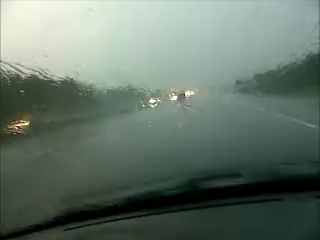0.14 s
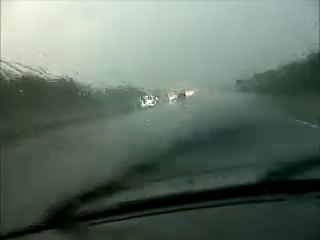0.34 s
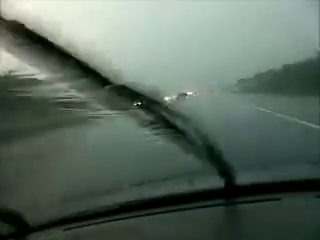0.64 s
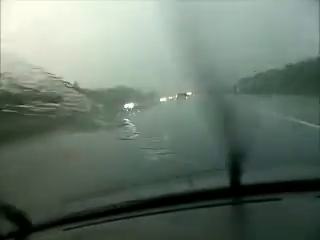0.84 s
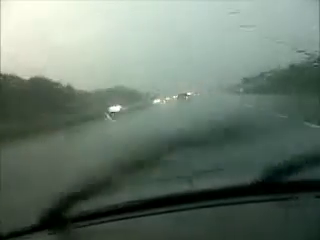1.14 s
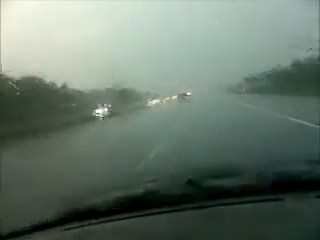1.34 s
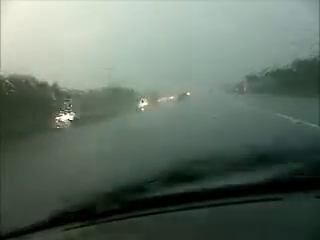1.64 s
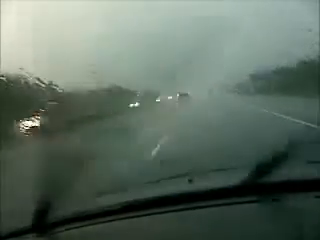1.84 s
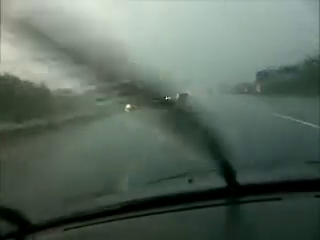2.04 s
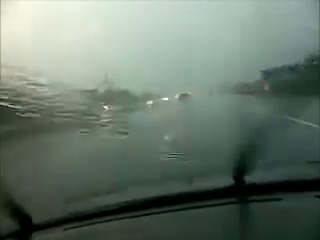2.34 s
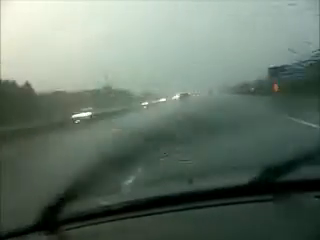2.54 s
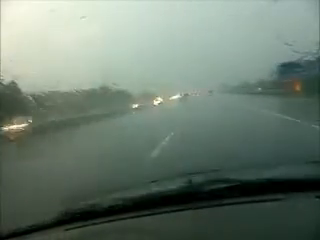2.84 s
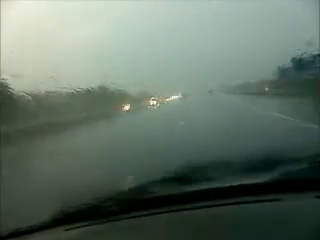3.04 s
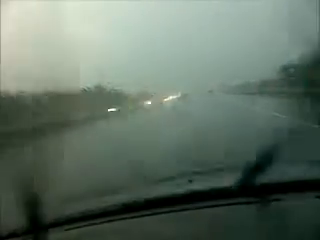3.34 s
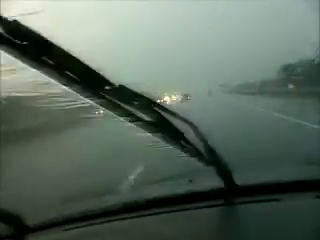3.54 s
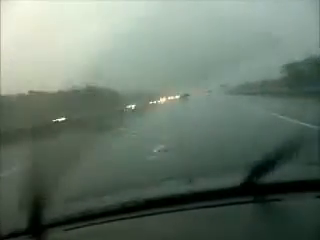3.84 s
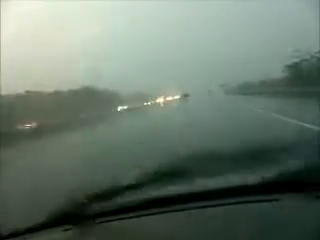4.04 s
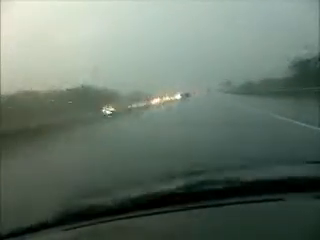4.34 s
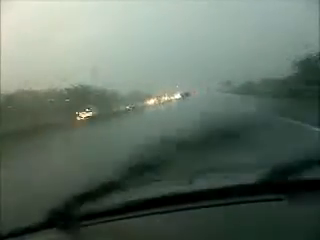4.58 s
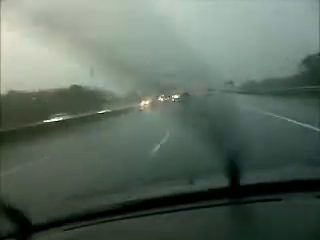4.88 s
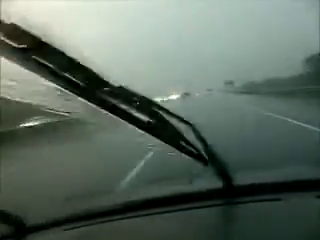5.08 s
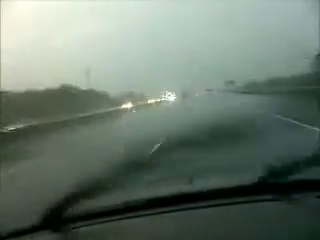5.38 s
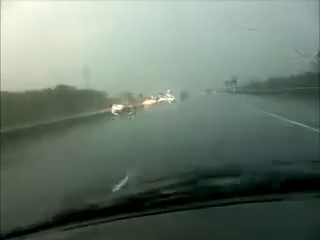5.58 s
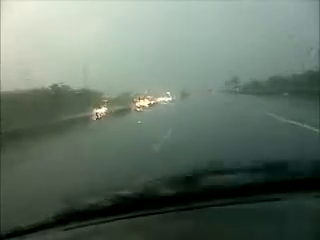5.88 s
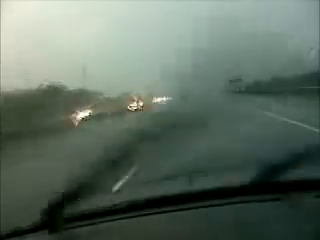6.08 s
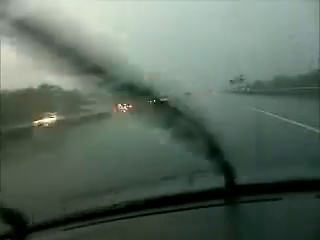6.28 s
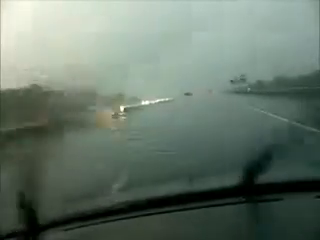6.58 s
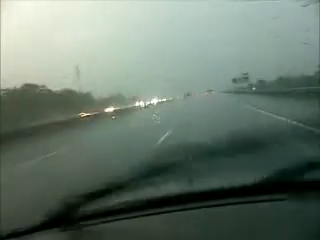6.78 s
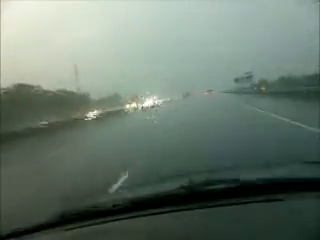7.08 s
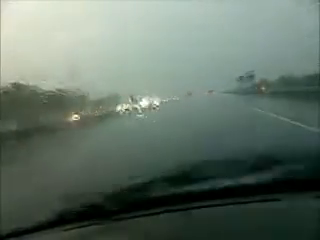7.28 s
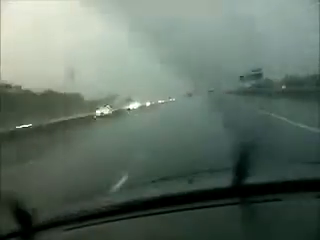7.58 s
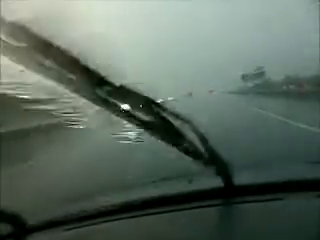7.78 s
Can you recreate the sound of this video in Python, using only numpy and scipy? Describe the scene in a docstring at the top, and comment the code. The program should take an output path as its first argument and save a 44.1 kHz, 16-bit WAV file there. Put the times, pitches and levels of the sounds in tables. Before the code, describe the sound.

Heavy rain hits the windshield and roof of a moving car from the start and continues for about eight seconds, heard from inside the small cabin. It comes in short, irregular sheets, several a second, with heavy drops knocking and fine ones ticking, broken only by split-second lulls. Fat drops burst on the glass throughout as sharp, close splats. Underneath runs a steady deep road rumble with the rush of tyres on the wet surface, and a low engine drone that wavers in level and sinks very slightly in pitch. At about 2 and 2.3 seconds the car body gives two soft, low booms, as if crossing seams in the road. Near 3 seconds the engine eases and sounds a little smoother. One more soft boom comes at about 7.3 seconds, while the rain and rumble carry on to the end.

```python
"""Inside a car on a motorway in a downpour. From the start, sheets of rain strike windscreen and roof:
heavy drops knock, fine ones tick, and the small cabin answers briefly, while the tyres rumble on the
wet road and the engine drones at its firing rate. Almost at once, fat drops begin to burst on the glass.
Around 2 s the body booms softly twice. Near 3 s the throttle eases and the second harmonic weakens;
the engine's pitch sinks slightly throughout. The body booms once more just after 7 s."""
import sys
import numpy as np
from scipy import signal
from scipy.fft import rfft, irfft, next_fast_len
from scipy.io import wavfile
from scipy.ndimage import map_coordinates

SR = 44100
rng = np.random.default_rng(int(sys.argv[2]) if len(sys.argv) > 2 else 0)


def generate_wav(signal):
    """Clip the signal to [-1, 1] and save it as 16-bit WAV at the path in sys.argv[1]."""
    frames = np.transpose(np.atleast_2d(signal))
    scaled = np.clip(frames, -1, 1) * 32767
    pcm = np.round(scaled).astype(np.int16)
    wavfile.write(sys.argv[1], SR, pcm)


N = 349272

# sheets of rain: (start [s], length [s], relative heavy-drop level [dB], relative fine-drop level [dB])
RAIN_SHEETS = [(0, .165, -14.5, -17.5), (0.245, 0.16, -21.5, -23.5), (0.533, 0.035, -12.5, -24),
               (0.643, .19, -19.5, -21.5), (0.923, 0.19, -18.5, -18), (1.18, 0.015, -27, -21.5),
               (1.257, .05, -13, -15), (1.323, 0.027, -13, -9.5), (1.383, 0.13, -26, -26.5),
               (1.552, 0.15, -18.5, -23.5), (1.715, 0.044, -16.5, -12), (1.809, .23, -17.5, -19.5),
               (2.249, 0.041, -18.5, -15.5), (2.354, .24, -19, -19), (2.755, 0.087, -19.5, -23.5),
               (2.823, 0.13, -17, -17.5), (2.974, .13, -17.5, -22.5), (3.117, .04, -23, -22.5),
               (3.268, .04, -17.5, -20), (3.453, 0.11, -21, -19.5), (3.563, .21, -16.5, -19.5),
               (3.813, .09, -24, -20.5), (3.952, .035, -17, -18), (4.02, 0.14, -21, -21.5),
               (4.214, .15, -20.5, -21), (4.444, .09, -20, -17), (4.592, 0.18, -21, -24),
               (4.775, .05, -15, -18), (4.878, 0.012, -21, -20.5), (5.017, 0.21, -27.5, -28),
               (5.235, .13, -22, -17.5), (5.403, 0.11, -16, -20.5), (5.542, 0.058, -18, -23.5),
               (5.666, .26, -20, -19.5), (6.027, 0.031, -16, -17.5), (6.074, 0.065, -12.5, -16.5),
               (6.185, 0.23, -19.5, -22.5), (6.33, .17, -19, -25.5), (6.617, .135, -21.5, -22),
               (6.759, 0.022, -14.5, -23.5), (6.819, 0.26, -26.5, -29.5), (7.116, 0.054, -22, -23),
               (7.236, .105, -14.5, -19.5), (7.375, .13, -21, -24), (7.548, 0.13, -22, -20),
               (7.814, 0.067, -17.5, -25.5)]
# brief lulls in the rain: (time [s], Gaussian half width [s])
RAIN_LULLS = [(0.231, 0.018), (.49, .025), (1.169, 0.016), (2.144, .03), (4.959, 0.032)]
# impact spectra of a heavy and of a fine drop: (frequency [Hz], relative level [dB])
KNOCK_SPECTRUM = [(100, -25), (220, -12.5), (280, -7.5), (430, -5.5), (650, -4), (790, -11), (950, -5.5),
                  (1080, -1), (1450, -1.8), (1570, -9), (1680, -5), (2300, -8.5), (3500, -11.5),
                  (7000, -26)]
TICK_SPECTRUM = [(200, -18.5), (700, -8.5), (1500, -6.5), (2300, -5), (3000, -0.5), (3700, -6.5),
                 (4600, -11), (6000, -13.5), (6900, -19.5)]
# resonances of the windscreen: (frequency [Hz], width [Hz], peak gain [dB])
GLASS_MODES = [(1060, 50, 0), (1240, 44, 5), (1450, 60, 1), (1630, 41, 4), (3100, 220, 0)]
# strength of the road rumble: (time [s], relative level [dB])
RUMBLE_LEVELS = [(0, -22), (1.2, -20.5), (2.3, -23.5), (3.2, -21.5), (4.2, -20.5), (5.5, -21), (6.6, -22),
                 (7.92, -19.5)]
# spectra of the road rumble and of the wet tyres: (frequency [Hz], relative level [dB])
RUMBLE_SPECTRUM = [(15, -18), (26, -6), (37, 4), (60, 2), (100, 0.5), (135, 1.5), (175, -8), (215, -10),
                   (400, -39)]
TYRE_SPECTRUM = [(150, -23.5), (215, -12.5), (250, 8), (310, -4), (400, -0.5), (650, -5.5), (800, -4),
                 (1150, -4), (2000, -11.5), (4000, -14), (7000, -29)]
# the engine slowing: (time [s], firing rate [Hz])
FIRING_RATES = [(0, 81.4), (2.6, 80.2), (5.5, 77.5), (6.4, 77.44), (7.92, 76.4)]
# the engine's fundamental in the cabin: (time [s], level [dB])
DRONE_LEVELS = [(0, -23.5), (.75, -30.5), (1.1, -23.5), (2.3, -31.5), (3.3, -26), (3.8, -32), (4.2, -28),
                (5.1, -23), (6.3, -28.5), (7, -23.5), (7.92, -23.5)]
# its overtones: (multiple of the firing rate [1], level pulling [dB], level eased [dB])
ENGINE_OVERTONES = [(2, -34, -41.5), (3, -45, -43)]
# fat drops bursting on the windscreen: (time [s], knock level [dB], tick level [dB])
FAT_DROPS = [(0.163, -14, -15), (0.259, -19, -18), (0.515, -13, -15), (0.533, -11, -20), (0.582, -14, -21),
             (0.619, -16, -16), (0.665, -20, -17), (0.783, -17, -13), (0.925, -22, -12), (1.04, -19, -14),
             (1.318, -18, -11), (1.549, -12, -22), (1.677, -15, -20), (1.709, -16, -14), (1.797, -13, -19),
             (2.19, -17, -18), (2.206, -16, -28), (2.33, -17, -20), (2.739, -17, -16), (2.915, -11, -16),
             (3.267, -12, -17), (3.568, -11, -22), (3.606, -12, -22), (3.716, -11, -22), (3.94, -11, -21),
             (4.283, -12, -21), (4.539, -13, -25), (4.722, -16, -18), (4.879, -11, -18), (5.071, -16, -24),
             (5.123, -15, -14), (5.24, -20, -15), (5.459, -15, -16), (5.485, -12, -21), (5.705, -13, -24),
             (5.935, -17, -15), (6.345, -17, -17), (6.551, -24, -13), (6.759, -17, -18), (6.956, -17, -20),
             (7.01, -21, -19), (7.076, -21, -20), (7.146, -17, -21), (7.247, -9, -20), (7.409, -20, -18),
             (7.555, -22, -18), (7.629, -17, -14), (7.772, -15, -15), (7.83, -18, -16)]
# booms of the body, as over seams in the road: (time [s], level [dB], Gaussian half width [s])
BODY_BOOMS = [(1.954, -21, 0.022), (2.286, -24.5, 0.047), (7.294, -24.5, 0.06)]
# low resonance of the body: (frequency [Hz], relative level [dB])
BODY_SPECTRUM = [(190, -36), (240, -2.5), (280, 0.5), (360, -18.5), (700, -45)]

BAND_LIMIT_HZ = 7000
TIME = np.arange(N) / SR


def amp(db):
    """Amplitude ratio of a level in decibels."""
    return 10 ** (np.asarray(db) / 20)


def unit(x):
    """Normalisation to an RMS of 1."""
    return x / np.sqrt(np.mean(x ** 2) + 1e-20)


def spectral_gain(spectrum, hz):
    """Gain by interpolation of levels on a logarithmic frequency axis."""
    knots_hz, db = np.transpose(spectrum)
    return amp(np.interp(np.log(hz + 1), np.log(knots_hz + 1), db))


def curve(rows):
    """Linear interpolation of (time, value) rows at every sample."""
    return np.interp(TIME, *np.transpose(rows))


def gaussian(centre_s, half_s):
    """A Gaussian envelope of height 1."""
    return np.exp(-((TIME - centre_s) / half_s) ** 2 / 2)


def wobble(knots_per_s):
    """Slow random modulation: a spline through Gaussian values."""
    knots = rng.standard_normal(int(N * knots_per_s / SR) + 4)
    return map_coordinates(knots, [TIME * knots_per_s])


def filtered(x, response):
    """Linear filtering: the spectrum is multiplied by a frequency response."""
    size = next_fast_len(N + SR // 2)
    return irfft(rfft(x, size) * response(np.fft.rfftfreq(size, 1 / SR)), size)[:N]


def shaped_noise(spectrum):
    """Spectral shaping of white noise, at an RMS of 1."""
    return unit(filtered(rng.standard_normal(N), lambda hz: spectral_gain(spectrum, hz)))


def rain_sheets(attack_s=.026, release_s=.036, lull_db=-5.5):
    """Incoherent sources add in power: sheets on steady rain give the heavy and fine levels in dB."""
    power = amp([[-25.5], [-26]]) ** 2 * np.ones(N)  # steady rain: heavy, fine
    for start, length, heavy_db, fine_db in RAIN_SHEETS:
        near = slice(*np.searchsorted(TIME, [start - attack_s, start + length + 10 * release_s]))
        age = TIME[near] - start
        rise = np.clip(age / attack_s + .5, 0, 1)
        fade = np.exp(-np.maximum(age - length, 0) / release_s)
        power[:, near] += (amp([[heavy_db], [fine_db]]) * rise * fade) ** 2
    lulls = sum(gaussian(centre_s, half_s) for centre_s, half_s in RAIN_LULLS)
    return 10 * np.log10(power) + lull_db * lulls


def glass_impact(spectrum, size=2048):
    """Impact excitation: a drop sends a minimum-phase pulse of energy 1 through the resonant glass."""
    hz = np.fft.rfftfreq(size, 1 / SR)
    resonance_db = sum(db / (1 + (2 * (hz - centre) / width) ** 2) for centre, width, db in GLASS_MODES)
    gain = spectral_gain(spectrum, hz) * amp(resonance_db) / (1 + (hz / BAND_LIMIT_HZ) ** 16)
    cepstrum = irfft(np.log(gain + 1e-6))
    cepstrum[1:size // 2] *= 2  # folding onto positive time makes the pulse causal
    cepstrum[size // 2:] = 0
    pulse = irfft(np.exp(rfft(cepstrum)))
    return pulse / np.linalg.norm(pulse)


def path_to_ear(pane_db, pane_t60=.021, cabin_db=-4.5, cabin_t60=.071, size=2048):
    """Impulse response from one spot: direct blow, bending waves in the pane, cabin reverberation."""
    t = np.arange(size) / SR
    tails = rng.standard_normal((2, size)) * amp(-60 * t / [[pane_t60], [cabin_t60]])
    tails /= np.linalg.norm(tails, axis=1, keepdims=True)
    response = amp([pane_db, cabin_db]) @ tails
    response[0] += 1  # the direct blow
    return response / np.linalg.norm(response)


def shower(level_db, spectrum, base_drops_per_s, clump_db, clump_s, pane_db, spread_db=4.5, spots=14):
    """Shot noise: drops land at random on several spots; harder rain brings more and bigger drops."""
    # spray lands in clumps, about 70 a second, that start at once and thin out over milliseconds
    onsets = (rng.random(N) < 70 / SR) * rng.uniform(.5, 1, N)
    clumps = signal.lfilter([1], [1, -np.exp(-1 / (clump_s * SR))], onsets)
    level_db = level_db + clump_db * np.minimum(unit(clumps - clumps.mean()), 2)
    flux = amp(level_db - np.mean(level_db)) ** .9
    hits = np.flatnonzero(rng.random(N) < base_drops_per_s * flux / SR)
    strength = amp(spread_db * np.clip(rng.standard_normal(N), -2, 2))[hits]
    strength /= np.sqrt(flux[hits])  # level_db alone then sets the power
    spot = rng.integers(spots, size=N)[hits]
    patter = np.zeros(N)
    for k in range(spots):
        blows = np.bincount(hits[spot == k], strength[spot == k], N)
        patter += signal.oaconvolve(blows, path_to_ear(pane_db))[:N]
    patter = signal.oaconvolve(patter - patter.mean(), glass_impact(spectrum))[:N]
    return amp(level_db) * unit(patter)


def rain():
    """Superposition of two drop populations: heavy drops knock, fine drops tick."""
    heavy_db, fine_db = rain_sheets()
    heavy = shower(heavy_db, KNOCK_SPECTRUM, base_drops_per_s=650, clump_db=.86, clump_s=.0029, pane_db=-7)
    fine = shower(fine_db, TICK_SPECTRUM, base_drops_per_s=1500, clump_db=1.19, clump_s=.0023, pane_db=0)
    return amp(.49) * heavy + amp(.13) * fine


def road_noise():
    """Random excitation: the road surface makes the body rumble, and the wet tyres rush."""
    rumble = amp(curve(RUMBLE_LEVELS) - 2) * shaped_noise(RUMBLE_SPECTRUM)
    tyres = shaped_noise(TYRE_SPECTRUM) * amp(-24.5 + .6 * wobble(5.8))
    return rumble + tyres


def engine(ease_at_s=3.15, ease_over_s=.3):
    """Periodic firing gives a harmonic series; off load the second harmonic falls, the third gains a bit."""
    phase = 2 * np.pi * np.cumsum(curve(FIRING_RATES)) / SR
    eased = np.clip((TIME - ease_at_s) / ease_over_s + .5, 0, 1)
    harmonics = [(1, curve(DRONE_LEVELS))]
    for order, pulling_db, eased_db in ENGINE_OVERTONES:
        harmonics.append((order, pulling_db + (eased_db - pulling_db) * eased))
    drone = np.zeros(N)
    for order, level_db in harmonics:
        waver = amp(1.4 * wobble(12))
        tone = np.sin(order * phase + .24 * wobble(12))
        drone += amp(level_db) * unit(waver * tone)
    return drone


def splats(burst_s=.006):
    """Transient excitation: a fat drop breaks up in milliseconds, driving the glass with noise bursts."""
    out = np.zeros(N + SR)
    knock, tick = glass_impact(KNOCK_SPECTRUM), glass_impact(TICK_SPECTRUM)
    t = np.arange(SR // 20) / SR
    spatter = np.exp(-(t / burst_s) ** 2) + .13 * np.exp(-t / .014)
    for start, knock_db, tick_db in FAT_DROPS:
        for pulse, db in (knock, knock_db), (tick, tick_db):
            drop = signal.fftconvolve(pulse, rng.standard_normal(len(t)) * spatter)
            burst_rms = np.linalg.norm(drop) / np.sqrt(burst_s * SR)
            out[round(start * SR):][:len(drop)] += amp(db) * drop / burst_rms
    return out[:N]


def body_booms():
    """Structural resonance: a low, narrow band of noise from the car body swells and fades."""
    swell = sum(amp(db) * gaussian(centre_s, half_s) for centre_s, db, half_s in BODY_BOOMS)
    return swell * shaped_noise(BODY_SPECTRUM)


def scene():
    """Linear superposition of all sources at the ear, in one channel."""
    return (rain() + road_noise() + engine() + splats() + body_booms())[None]


def record(dry):
    """Soft saturation rounds the highest peaks; a steep low-pass filter limits the band."""
    rounded = dry[0] / (1 + np.abs(dry[0] / .97) ** 8) ** (1 / 8)
    return filtered(rounded, lambda hz: 1 / np.sqrt(1 + (hz / BAND_LIMIT_HZ) ** 200))[None]


dry = scene()
out = record(dry)
generate_wav(out)
```